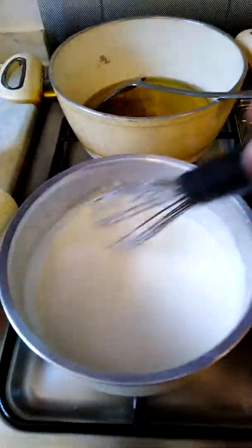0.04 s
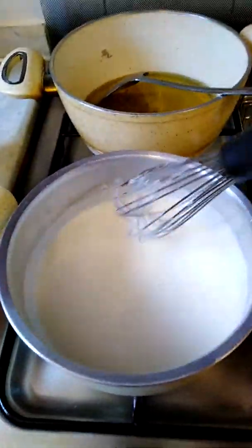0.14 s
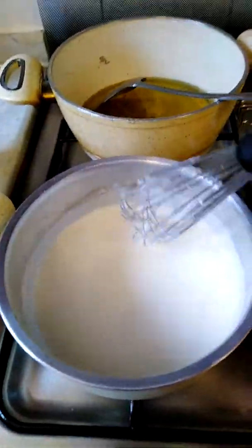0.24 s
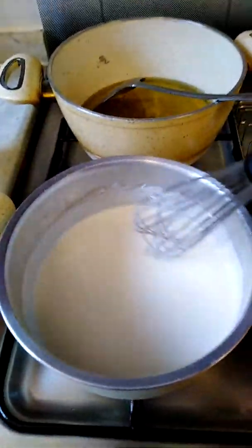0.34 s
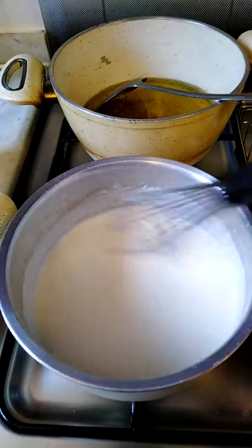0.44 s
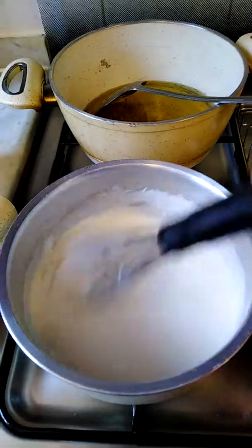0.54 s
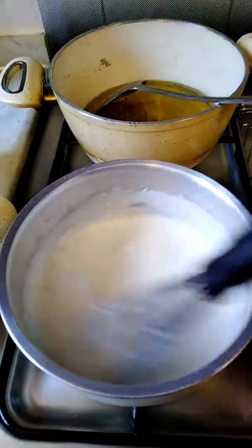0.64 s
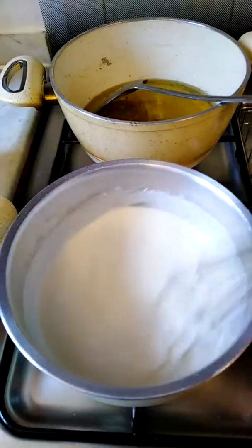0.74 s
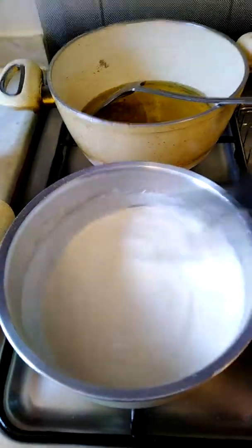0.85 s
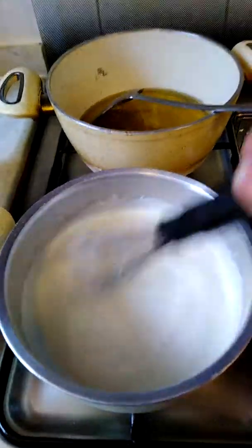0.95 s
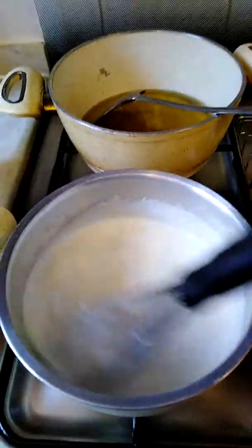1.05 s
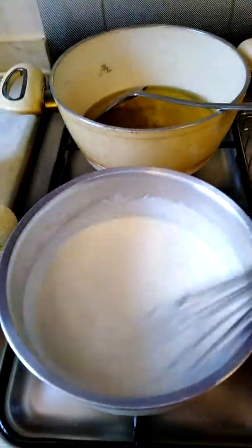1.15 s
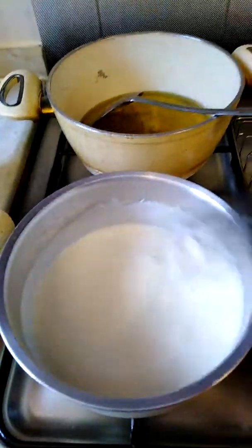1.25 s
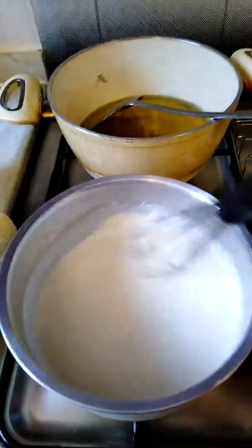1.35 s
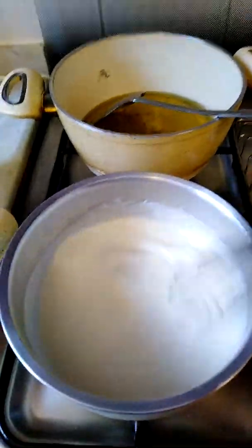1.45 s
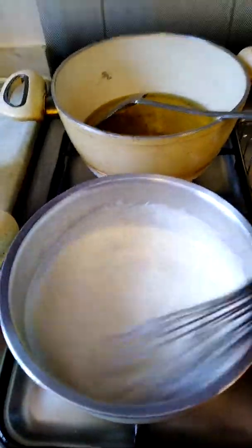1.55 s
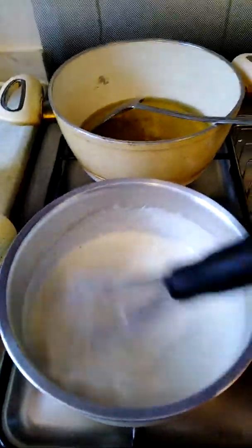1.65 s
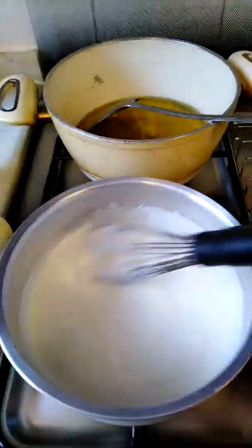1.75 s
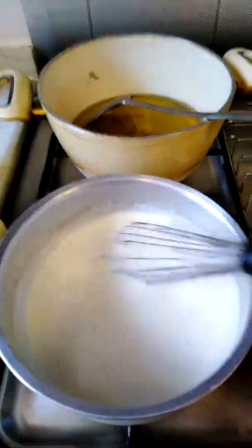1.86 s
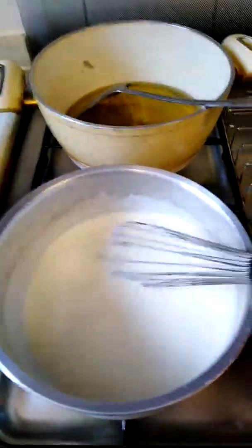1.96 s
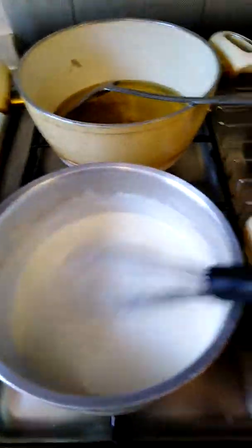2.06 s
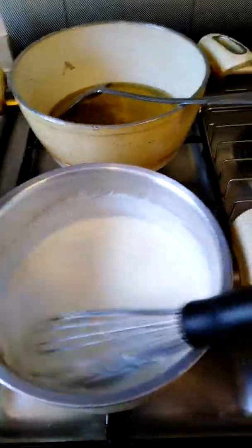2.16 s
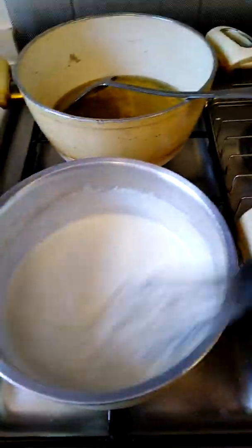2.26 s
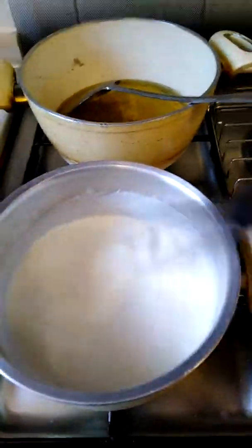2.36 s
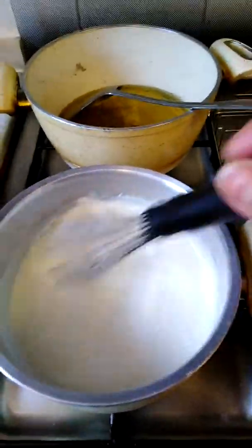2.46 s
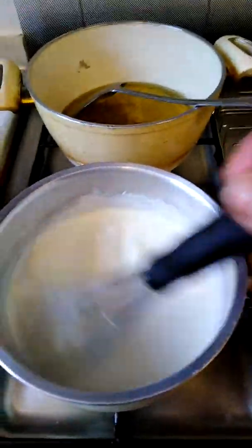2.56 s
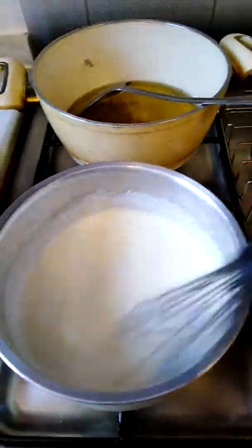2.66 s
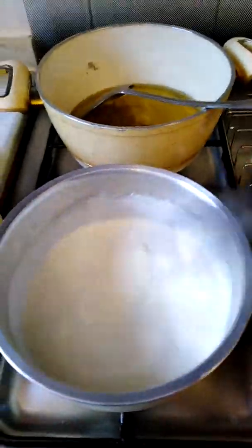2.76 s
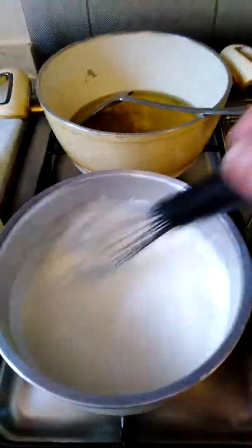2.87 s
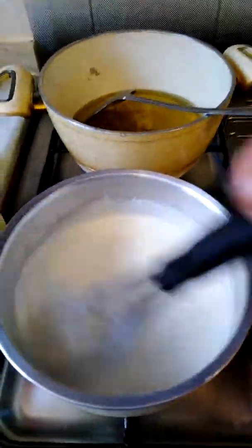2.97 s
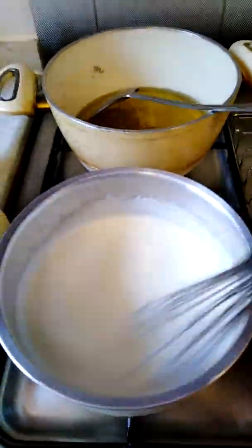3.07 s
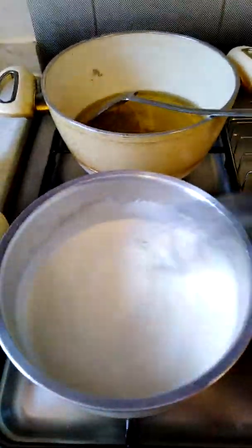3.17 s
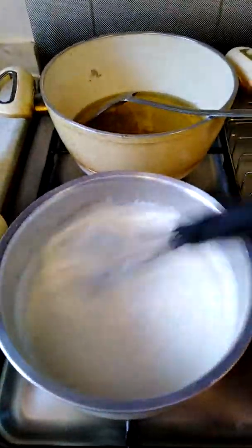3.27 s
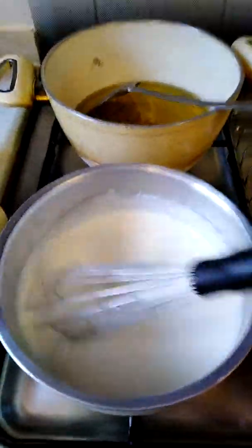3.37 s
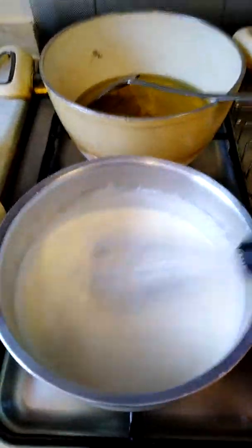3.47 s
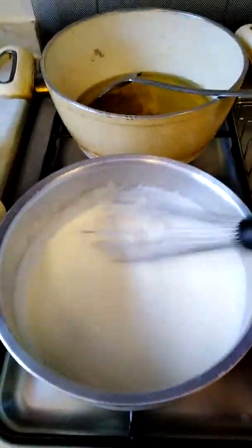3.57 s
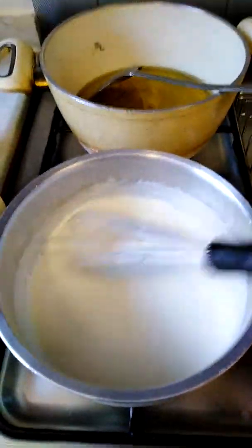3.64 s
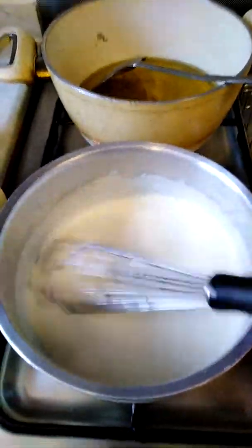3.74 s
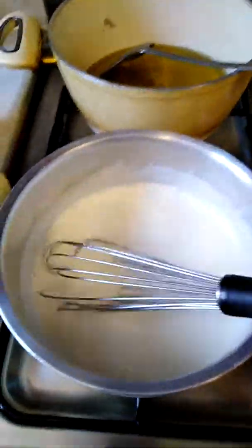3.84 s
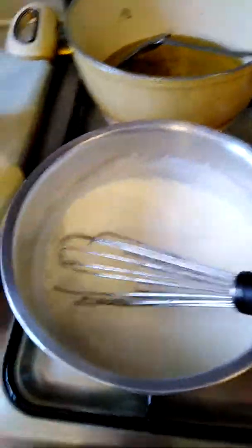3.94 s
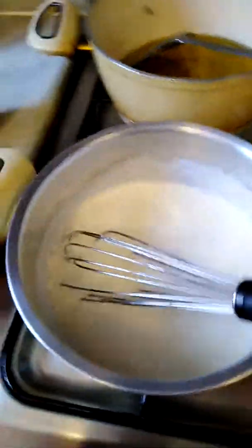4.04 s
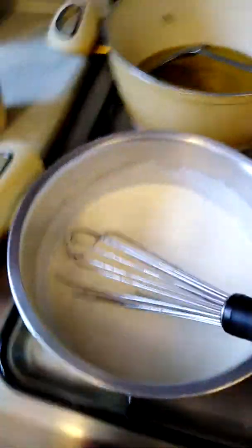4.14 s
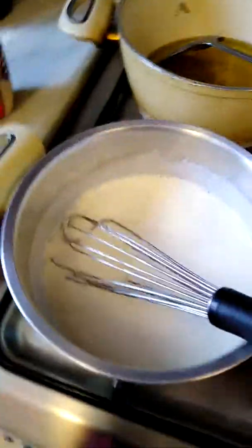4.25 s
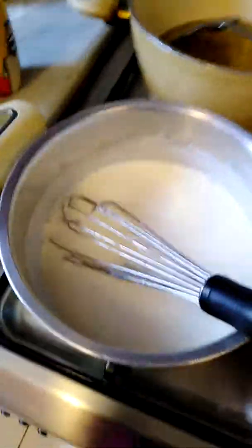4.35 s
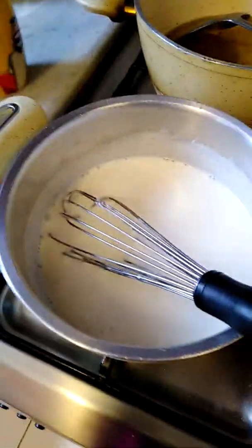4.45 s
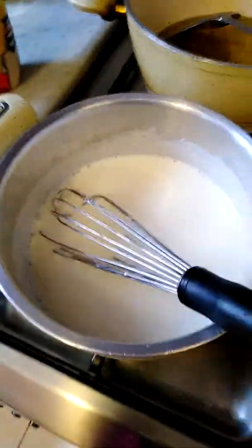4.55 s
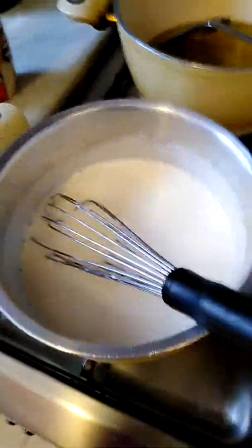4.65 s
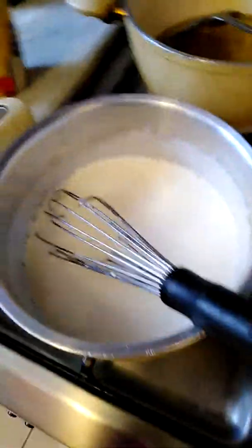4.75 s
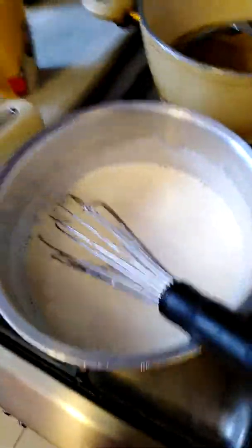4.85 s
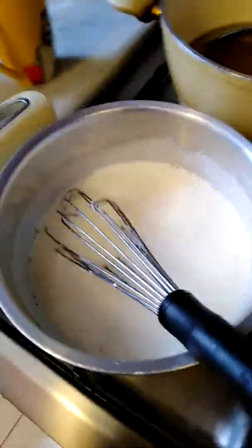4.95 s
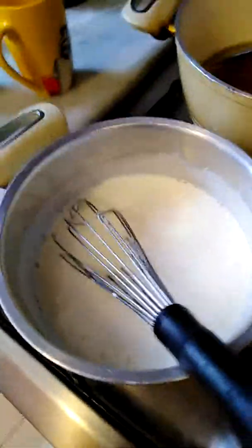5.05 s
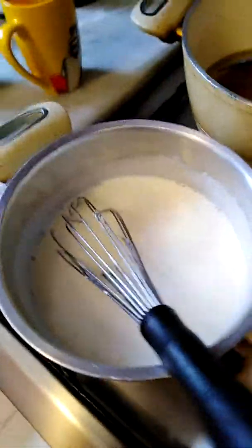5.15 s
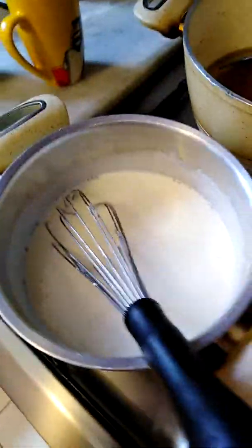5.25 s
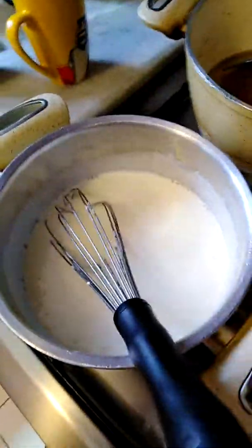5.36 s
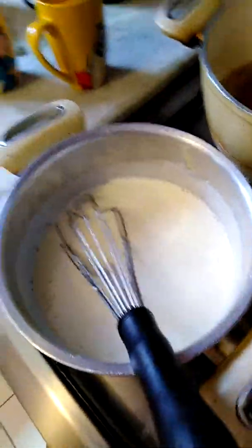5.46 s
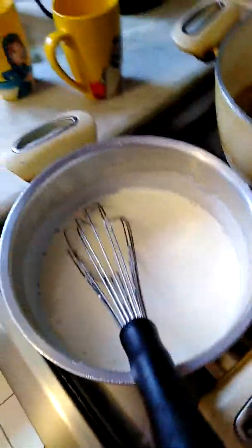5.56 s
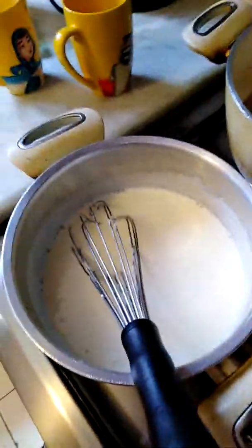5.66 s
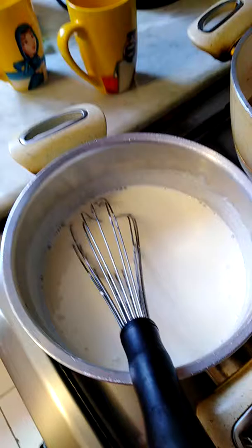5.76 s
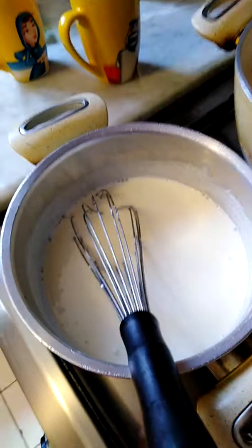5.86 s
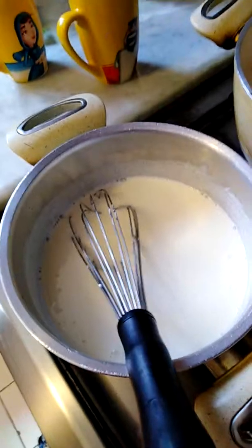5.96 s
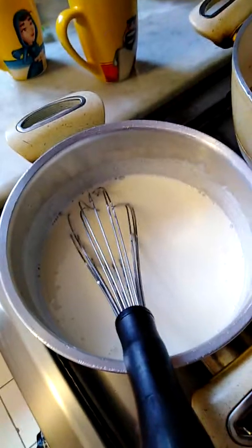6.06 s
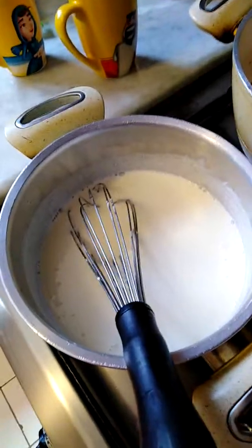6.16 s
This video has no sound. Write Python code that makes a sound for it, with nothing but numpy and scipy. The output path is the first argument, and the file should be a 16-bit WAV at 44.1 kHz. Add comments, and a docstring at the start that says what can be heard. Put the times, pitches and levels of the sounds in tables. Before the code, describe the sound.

A close stereo pickup in a small kitchen. A short scrape opens at 0 s, then a brief gap with only faint, watery flickering noise and weak low hum. From about 0.46 s a wire whisk works in a thin metal saucepan: tight clusters of bright, dry clicks at 0.47, 0.8, 1.27, 1.5, 1.64 and 1.93 s, joined by gritty, uneven scrapes and a low hollow pan ring. Stirring continues from 2.2 to 3.0 s with denser scraping, the hardest taps at about 3.17 s and another sharp group at 3.6 s. Soft, muffled sauce plops sound around 3.35 and 3.8 s. By 3.9 s the whisk rests. Very quiet plops, tiny pings and thin lingering tones follow, with barely audible ticks and handling rustles from 4.6 s. At 5.95 s a rounder plop sounds, and at 6.14 s a small tick and clearer hand rustle end it.

```python
"""A wire whisk taps and scrapes inside a thin metal saucepan of thick sauce, then is laid down.
Taps are noise bursts and drags are uneven grains, both ringing the modes of the pan.
The sauce plops as damped resonances; a hand rustles near two microphone ports.
Beneath lie narrow flickering bands of background noise, such as noise suppression leaves,
over faint hiss, rumble and a hum of two wavering sines."""
import sys
import numpy as np
from scipy import signal
from scipy.fft import rfft, irfft, next_fast_len
from scipy.io import wavfile
from scipy.ndimage import uniform_filter1d, map_coordinates

SR = 44100
rng = np.random.default_rng(int(sys.argv[2]) if len(sys.argv) > 2 else 0)


def wav_out(sig):
    """Save sig, one row per channel (or a flat mono array), as 16-bit PCM at SR to the path in sys.argv[1]."""
    wavfile.write(sys.argv[1], SR, np.round(np.clip(np.atleast_2d(sig).T, -1, 1) * 32767).astype(np.int16))


def attenuation_scalar(level_db):
    """Turn a level in dB into a linear amplitude multiplier (20 dB per decade)."""
    decades = np.asarray(level_db, float) / 20
    return 10 ** decades


N = 273861

# wire taps: t/s, rim level/dB before a common trim, body re rim/dB before the bottom and wall offsets,
# wires re rim/dB, left-right/dB
TAPS = [(0.4606, -20.5, -1, -1, -1.5), (0.4689, -18, -6, 2, 2), (0.4766, -19.5, -6.5, -10.5, -3.5),
        (0.504, -39.5, -7, 9.5, -7.5), (0.682, -33, -2, -9.5, 4), (0.75, -24, -19.5, -10, 14.5),
        (0.757, -23.5, -24.5, -11, -1), (0.78, -16.5, -17, -23, 1), (0.7936, -21.5, -24, -8, 9.5),
        (0.817, -23.5, -32, -1, 6), (0.842, -27.5, -24, -2, -4), (0.865, -30, -7, 5, -2),
        (0.904, -33, -20, 0, -2), (0.982, -49, -26, -5, -4), (1.008, -40, -24, 0, -6),
        (1.056, -35, -10, -13, -9), (1.2694, -22, -13, -10.5, -8), (1.272, -16.5, -21.5, -19, 3.5),
        (1.279, -22.5, -20, -13, 0), (1.305, -31, -15, -9, 2), (1.345, -30.5, -12, -1, -4),
        (1.503, -19.5, -35, -26, 0.5), (1.5269, -16, -37, -24, 7), (1.624, -21, -15, -1, 2.5),
        (1.6371, -14, -18, 1.5, -0.5), (1.934, -20.5, -46, -36, 2), (2.2084, -18.5, -6.5, 3, -0.5),
        (2.342, -30.5, -25, -6.5, 1), (2.3972, -19.5, -13, 4.5, -1.5), (2.4025, -27, -4.5, 0.5, -13),
        (2.5306, -31.5, -14, 0.5, -7.5), (2.597, -30, -16, 8, -1), (2.6074, -28, -14.5, 2, -1.5),
        (2.7193, -24, -20.5, -3.5, 6), (2.754, -24.5, -23, -10, -5), (2.774, -18, -29.5, 0.5, 0),
        (2.815, -32.5, -10.5, 5.5, -3), (3.0542, -22.5, -12.5, -6, 2.5), (3.077, -22, -24.5, -8, -2),
        (3.1659, -13, -26.5, -5.5, -1.5), (3.168, -11, -27.5, -5, 0.5), (3.176, -11, -22.5, -5.5, -2),
        (3.2472, -27.5, -9, -1, -7), (3.2617, -32.5, -9.5, -6, 10), (3.302, -31, -15, -4, 0),
        (3.3093, -22, -22.5, -6.5, -1), (3.496, -38, -8.5, 9, -2.5), (3.6112, -15, -18.5, 0, -7.5),
        (3.616, -18, -16, 0, -2), (3.624, -22.5, -19, -2, -3.5), (3.8111, -33.5, -5, -2.5, -10),
        (4.6, -61.5, -14, 3, -13), (4.813, -74, -17.5, 19.5, -15), (5.034, -60.5, -25, -3, -4),
        (5.2763, -76, -14.5, 10, 0), (5.953, -52, 4, -33.5, 2), (6.137, -44, -19, -31, 12)]
# bottom, wall, rim, wires: low edge f/Hz, high edge f/Hz
BANDS = [(450, 1500), (1500, 4500), (4500, 9300), (9300, 17000)]
LOW_MODE = [(790, 75, 0)]  # mode of the pan under the drag: f/Hz, width/Hz, level/dB


def unit(x):
    """Scaled to rms 1."""
    return x / np.sqrt(np.mean(x ** 2) + 1e-20)


def along(points, hz):
    """Interpolates (f/Hz, value) points on a log frequency axis."""
    f, v = np.transpose(points)
    return np.interp(np.log(hz + 1), np.log(f + 1), v)


def curves(rows):
    """One value per sample for each column after the time."""
    s, *cols = np.transpose(rows)
    return [np.interp(np.arange(N) / SR, s, c) for c in cols]


def wobble(rate_hz):
    """Smooth random curve with rate_hz knots a second."""
    knots = rng.standard_normal(int(N * rate_hz / SR) + 4)
    return map_coordinates(knots, [np.arange(N) * rate_hz / SR])


def filtered(x, response):
    """x through a complex response of frequency."""
    m = next_fast_len(x.shape[-1] + 4096)
    return irfft(rfft(x, m) * response(np.fft.rfftfreq(m, 1 / SR)), m)[..., :x.shape[-1]]


def modes(table, hz, spread_db=0):
    """Causal resonances of alternating sign, each at a random strength within spread_db rms."""
    luck_db = spread_db * rng.standard_normal(len(table))
    total = 0
    for k, (centre, width, db) in enumerate(table):
        resonance = 1j * hz * width / (centre * centre - hz * hz + 1j * hz * width)
        total = total + (-1) ** k * attenuation_scalar(db + luck_db[k]) * resonance
    return total


def band(hz, lo_hz, hi_hz):
    """Band gain with steep smooth edges."""
    return 1 / np.sqrt((1 + (lo_hz / (hz + 1)) ** 12) * (1 + (hz / hi_hz) ** 12))


def patchy(x, patchy_db, bins, frames):
    """Random gain in patches of time and frequency."""
    z = signal.stft(x, nperseg=512)[2]
    field = uniform_filter1d(rng.standard_normal(z.shape[-2:]), bins, 0)
    field = uniform_filter1d(field, frames, 1)
    return signal.istft(z * attenuation_scalar(patchy_db * unit(field)), nperseg=512)[1][..., :N]


def sides(db):
    """Left and right gains for a left-right difference."""
    return attenuation_scalar(np.array([db, -db]) / 2)


def swell(rows):
    """Power of strokes that rise and fall straight in dB; a row's level may hold several bands."""
    power = np.zeros((np.size(rows[0][1]), N + 2 * SR))
    t = np.arange(-SR // 2, SR // 2) / SR
    for s, db, rise_s, fall_s in rows:  # times per 20 dB
        slope = np.maximum(t / max(fall_s, .003), -t / max(rise_s, .0003))
        power[:, round(s * SR):][:, :len(t)] += attenuation_scalar(np.reshape(db, (-1, 1)) - 20 * slope) ** 2
    return power[:, SR // 2:][:, :N]


def spread(gain, patchy_db, bins, frames):
    """Stereo noise of rms 1 coloured by gain(hz); left-right likeness varies with frequency."""
    # f/Hz, left-right likeness (correlation)
    likeness = [(60, 0.94), (130, 0.97), (290, 0.28), (640, 0.78), (1400, 0.041), (3000, 0.043)]
    # f/Hz, left-right/dB of the background
    lean = [(60, -12.5), (110, 2), (200, -8.5), (380, 12), (700, 3), (1290, 15), (2380, 7), (4400, 9.5),
            (8120, 13), (15000, -4)]
    pair = patchy(rng.standard_normal((2, N)), patchy_db, bins, frames)

    def mid_side(hz):
        turn = np.arccos(np.clip(along(likeness, hz), -1, 1)) / 2
        return gain(hz) * np.array([np.cos(turn), np.sin(turn)])

    mid, side = filtered(pair, mid_side)
    return unit(filtered(np.array([mid + side, mid - side]), lambda hz: sides(along(lean, hz))))


def background():
    """Narrow flickering bands of noise, as noise suppression leaves, over faint hiss, hum and rumble."""
    # narrow bands: t/s, upper level/dB, middle level/dB, low level/dB
    band_levels = [(0.0, -50, -58, -56), (0.43, -53.5, -56, -65.5), (0.64, -51, -54, -56.5),
                   (1.49, -58, -57.5, -59), (2.32, -50.5, -55, -58.5), (2.7, -53, -59, -61),
                   (3.72, -53.5, -52.5, -59.5), (3.92, -58.5, -60.5, -81), (4.15, -55, -60, -71),
                   (4.29, -72.5, -66.5, -70), (4.6, -64.5, -63.5, -65.5), (4.75, -56.5, -71, -71),
                   (5.0, -53, -64, -69.5), (5.43, -51.5, -62, -70.5), (6.04, -49.5, -58, -74.5),
                   (6.21, -48, -56, -62.5)]
    # hum: t/s, upper line level/dB, lower line level/dB
    hum_levels = [(0.0, -53, -61), (0.43, -65, -69), (0.64, -57.5, -64), (1.49, -68, -82), (1.75, -55, -67),
                  (2.32, -66, -77), (2.61, -54.5, -57), (2.92, -62, -76), (3.27, -55.5, -59),
                  (3.92, -56, -57.5), (4.29, -63.5, -69), (5.43, -64.5, -84.5), (5.79, -59.5, -79),
                  (6.04, -68.5, -97), (6.21, -55, -80)]
    # thin treble: t/s, level/dB
    thin_level = [(0.0, -51), (0.26, -60), (0.64, -54), (1.49, -58), (3.92, -63), (4.29, -66.5),
                  (6.04, -66.5), (6.21, -71)]
    # narrow bands, shape before the power law: f/Hz, width/Hz, level/dB
    upper_modes = [(1384.5, 110, 0), (1514, 110, -2.5), (1646, 130, -6), (1026, 64, -7)]
    middle_modes = [(1276, 140, 0)]
    low_modes = [(355, 99, -5.5), (470, 50, 2), (532, 66, 0.5), (652, 100, 0)]
    thin_modes = [(2950, 30, -13), (4570, 34, -13), (5400, 110, -7.5), (7196, 78, 1), (7950, 43, -14),
                  (9120, 110, 0), (9700, 240, -12.5), (10560, 130, 2.5), (12600, 120, -12),
                  (13340, 480, 0.5), (14000, 220, -2.5)]
    # rumble spectrum shape: f/Hz, density/dB per Hz
    rumble_shape = [(15, -52), (25, -17), (70, -13.5), (118, -1), (145, -8.5), (182, -25), (226, -13),
                    (330, -14.5), (430, -49.5), (730, -120)]

    upper_db, middle_db, low_db = curves(band_levels)
    upper_line_db, lower_line_db = curves(hum_levels)
    thin_db, = curves(thin_level)

    def upper_gain(hz):
        return np.abs(modes(upper_modes, hz)) ** 2.24 * band(hz, 950, 1900)

    def low_gain(hz):
        return np.abs(modes(low_modes, hz)) ** 1.9 * band(hz, 370, 1100)

    def thin_gain(hz):
        return (0.015 + np.abs(modes(thin_modes, hz)) ** 2.2) * band(hz, 1500, 21000)

    upper = spread(upper_gain, 2.9, bins=2, frames=10)
    middle = spread(lambda hz: np.abs(modes(middle_modes, hz)) ** 2.0, 2.5, bins=2, frames=10)
    low = spread(low_gain, 3.4, bins=2, frames=10)
    thin = spread(thin_gain, 7.5, bins=2, frames=60)
    hiss = spread(lambda hz: band(hz, 1700, 9000), 1.3, bins=2, frames=20)
    rumble = spread(lambda hz: attenuation_scalar(along(rumble_shape, hz)), 4.2, bins=2, frames=10)

    t = np.arange(N) / SR
    upper_line = np.sin(2 * np.pi * 119.8 * t + 0.53 * wobble(4.3))
    lower_line = np.sin(2 * np.pi * 58.5 * t + 0.57 * wobble(4.6))
    hum = attenuation_scalar(upper_line_db + 2.7 * wobble(6.4)) * upper_line
    hum = hum + attenuation_scalar(lower_line_db + 1 * wobble(27)) * lower_line

    out = attenuation_scalar(upper_db) * upper + attenuation_scalar(middle_db) * middle
    out += attenuation_scalar(low_db + 1.9 * wobble(22)) * low + attenuation_scalar(thin_db) * thin
    return out + attenuation_scalar(-79.5) * hiss + attenuation_scalar(-67.5) * rumble + hum * sides(1.3)[:, None]


def kitchen(x):
    """Room: each third of a second gets a new noise tail; each frequency dies at its own speed."""
    # f/Hz, t60/s
    decay = [(300, 0.5), (2000, 0.42), (6000, 0.2), (14000, 0.1)]
    step, out = SR // 3, np.zeros((2, N + 2 * SR))
    for a in range(0, N, step):
        hz, t, z = signal.stft(rng.standard_normal((2, SR // 2)), SR, nperseg=256)
        z = z * attenuation_scalar(-60 * t / along(decay, hz)[:, None])
        tail = signal.istft(z, SR, nperseg=256)[1]
        wet = signal.fftconvolve(x[:, a:a + step], tail / np.linalg.norm(tail[0]), axes=1)
        out[:, a + 200:][:, :wet.shape[1]] += wet  # 200 samples of pre-delay
    return out[:, :N]


def pockets(table, width, thud_db):
    """Each soft noise push rings a resonance; width is relative to its pitch, a thud lies below it."""
    out, t = np.zeros((2, N + SR)), np.arange(SR // 2) / SR
    for s, db, hz, pan_db, life_ms in table:
        fade = attenuation_scalar(-60 * t * 1000 / max(life_ms, 10)) * (1 - np.exp(-t / .008))
        push = rng.standard_normal(len(t)) * fade
        resonance = [(hz, width * hz, 0)]
        ring = filtered(push, lambda f: modes(resonance, f) ** 2 + attenuation_scalar(thud_db) * band(f, 75, hz))
        ring = ring / np.abs(ring).max()
        out[:, round(s * SR):][:, :len(t)] += attenuation_scalar(db) * sides(pan_db)[:, None] * ring
    return out[:, :N]


def plops():
    """Air pockets burst as broad low resonances; narrow faint pings; thin lingering tones."""
    # all three: t/s, peak level/dB, f/Hz, left-right/dB, t60 of the push/ms
    bursts = [(1.762, -45, 161, 2, 150), (1.765, -51, 260, 3.5, 96), (3.334, -32.5, 362, 4, 96),
              (3.36, -34, 457, 4, 65), (3.375, -44, 208, 1, 155), (3.399, -44, 487, 9, 97),
              (3.8, -36, 417, 8.5, 110), (3.845, -42.5, 408, 7, 140), (3.835, -52, 188, 5, 150),
              (4.086, -52, 470, 13.5, 210), (4.19, -56.5, 470, 15, 100), (4.322, -53.5, 475, 14, 53),
              (4.408, -57.5, 453, 14, 52), (4.601, -51.5, 472, 9, 92), (4.62, -54, 600, 2, 140),
              (4.905, -57, 461, 12, 130), (5.59, -55, 613, -15, 220), (5.718, -58, 168, -12.5, 54),
              (5.96, -42, 615, -4.5, 320), (6.149, -48.5, 267, 11, 120)]
    # while the whisk rests
    pings = [(4.15, -64, 4550, 11, 200), (4.33, -67.5, 4240, 11, 260), (4.6, -70, 6090, 6, 420),
             (5.028, -59, 4570, -7, 270), (5.475, -69, 4270, 16, 340), (5.475, -68, 4420, 14, 280),
             (5.905, -65, 4600, 2, 150)]
    # after the handle is nudged
    tones = [(4.62, -71, 2950, 19, 1200), (5.41, -68, 2955, -8, 1200), (5.62, -64, 2980, 5.5, 900),
             (5.96, -62, 2950, 13, 600)]
    out = pockets(bursts, width=0.26, thud_db=-23.5)
    out = out + pockets(pings, width=0.03, thud_db=-61.5)
    return out + pockets(tones, width=0.014, thud_db=-70.5)


def ports(x, scatter_db, life_s):
    """Each port hears the direct sound plus its own quick reflections off the pan's rim and the hob."""
    t = np.arange(SR // 50) / SR
    echo = rng.standard_normal((2, len(t))) * attenuation_scalar(-60 * t / life_s)
    echo = attenuation_scalar(scatter_db) * echo / np.linalg.norm(echo, axis=1, keepdims=True)
    echo[0, 5] += 1  # the left port lies a few samples further away
    echo[1, 0] += 1
    return signal.fftconvolve(x[None], echo, axes=1)[:, :len(x)]


def metal(force, ring_db, spread_db):
    """The pan answers a force: broad clank plus modes, split into BANDS."""
    # modes of the pan: f/Hz, width/Hz, level/dB before ring_db
    pan = [(890, 25, -20), (1260, 210, -12), (2337, 90, -15), (2545, 59, -8.5), (3008, 190, -9),
           (3690, 67, -6.5), (5278, 260, -9), (6375, 150, -0.5), (6900, 300, -2.5), (8420, 300, -3),
           (8780, 250, -8), (9815, 380, -0.5), (11330, 370, -6.5), (12450, 420, -0.5)]
    # broad colour of steel on steel: f/Hz, density/dB per Hz
    clank = [(260, -36), (450, -24.5), (572, -16.5), (785, -1), (1160, -7), (2810, -9), (3030, -18.5),
             (3320, -7.5), (6730, 0), (7820, -4.5), (9940, -2.5), (13800, 0.5), (16300, -14)]

    def response(hz):
        split = np.array([band(hz, lo, hi) for lo, hi in BANDS])[:, None]
        return (attenuation_scalar(along(clank, hz)) + attenuation_scalar(ring_db) * modes(pan, hz, spread_db)) * split

    return filtered(force, response)


def rasps():
    """A wire rasps along the wall: uneven grains drive a few low modes."""
    # peak t/s, level/dB, 20 dB rise/s, 20 dB fall/s
    strokes = [(0.93, -44, .08, .04), (2.145, -43, .08, .05), (3.528, -37, .03, .15), (3.56, -37, .08, .08)]
    # f/Hz, width/Hz, level/dB before squaring
    wall_modes = [(1646, 160, 0), (1948, 160, -1), (2345, 200, -1), (2950, 250, -2), (3400, 250, -4)]
    grains = rng.standard_normal(N) * attenuation_scalar(2.2 * wobble(120))
    heard = ports(grains, scatter_db=-3.0, life_s=0.0049)
    ring = filtered(heard, lambda hz: modes(wall_modes, hz) ** 2 * band(hz, 1200, 3900))
    return np.sqrt(swell(strokes)) * unit(ring)


def drones():
    """Fine friction of wires crossing the bottom keeps a low mode of the pan ringing."""
    # peak t/s, level/dB, 20 dB rise/s, 20 dB fall/s (swell() sets least times)
    strokes = [(0.47, -49, 0, -0.5), (0.86, -49, 0, 0.44), (1.07, -42.5, -0.1, 0.04),
               (1.51, -46.5, 0.23, 0.12), (2.405, -42, 0, 0.05), (2.57, -45.5, 0.34, 0.14),
               (2.84, -43, 0, 0.34), (2.97, -41.5, 0, 0.1), (3.23, -43, 0.1, -0.05)]
    heard = ports(rng.standard_normal(N), scatter_db=-4, life_s=0.011)
    ring = filtered(heard, lambda hz: modes(LOW_MODE, hz) ** 2)
    return np.sqrt(swell(strokes)) * unit(ring)


def slips(rate_hz, size, life_s):
    """Gain that jumps when a wire catches, at random moments, and sinks again."""
    catch = (rng.random(N) < rate_hz / SR) * rng.exponential(size, N)
    return unit(1 + signal.lfilter([1], [1, -np.exp(-1 / (life_s * SR))], catch))


def contact():
    """Gains of bottom, wall, rim and wires: steady pressure, scrapes, a skid after each tap, the hand."""
    # wires resting on the pan as they stir: t/s, treble level/dB, bottom level/dB
    pressure = [(0.0, -34, -38), (0.18, -75, -87), (0.462, -83, -81), (0.48, -33, -45),
                (0.62, -53.5, -54.5), (0.85, -41.5, -43), (1.0, -46, -54.5), (1.26, -50.5, -66),
                (1.3, -55.5, -49), (1.6, -47, -57.5), (1.75, -43, -46.5), (1.92, -64, -69),
                (2.06, -61.5, -93), (2.14, -44, -85), (2.38, -43.5, -65), (2.47, -35.5, -60),
                (2.525, -58.5, -55), (2.55, -40.5, -53.5), (3.0, -44.5, -53), (3.15, -47.5, -56.5),
                (3.3, -54.5, -45), (3.48, -54, -65), (3.72, -43, -70), (3.9, -60.5, -59.5),
                (3.96, -81, -86), (6.21, -77.5, -74)]
    # single scrapes: peak t/s, treble level/dB before the rim and wires split, 20 dB rise/s, 20 dB fall/s
    # (swell() sets least times), bottom re treble/dB, wall re treble/dB
    scrapes = [(0.031, -32.5, 10, 0.01, -20, -12), (0.49, -34.5, 0, 0.2, -8.5, -13),
               (0.64, -43.5, 0.17, 1.5, -23, -5.5), (0.687, -28.5, 0.04, 0.2, -22, -14.5),
               (0.724, -34, 0.12, 0.06, -29, -20), (0.8, -22.5, -0.0161, -0.01, -29, -22.5),
               (0.938, -36.5, 0.28, 0.07, -8, -5), (1.058, -40, 0, 0.08, -11, -10),
               (1.131, -32, 0.08, 0.11, -26, -9.5), (1.155, -31.5, 0.08, 0.01, -21, -12),
               (1.471, -40.5, 0.1, 0.2, -32, -5), (1.641, -23, 0.02, 0.0662, -12.5, -11),
               (2.102, -35, 0.03, 0.24, -34, -12), (2.244, -36.5, 0.01, -0.05, -21, -3),
               (2.448, -34.5, 0, -0.12, -12, 2.5), (2.55, -40.5, 0.12, 0, -8.5, -4),
               (2.7, -34, 0.4, 0.53, -24, -12.5), (2.771, -26, 0.06, 0.04, -17, -8.5),
               (2.895, -32.5, 0.3, 0.04, -18, -9), (2.944, -38, -0.5, 0.24, -12, -12.5),
               (3.07, -29, 0, 0.02, -13, -11), (3.261, -29.5, 0.06, 0.12, -13.5, -8.5),
               (3.337, -37.5, 0, 0.36, -8, -11.5), (3.396, -39, 0.4, -0.16, -21, -4),
               (3.53, -37, -0.34, 0.07, -24.5, -4.5), (3.602, -25.5, 0.03, -0.09, -28.5, -13),
               (3.817, -39.5, 0.08, 0.17, -11.5, -7.5)]
    # a hand rustling near the microphone, same columns
    rustles = [(4.614, -71.5, 0.028, 0.13, -14, 12.7), (5.634, -68.5, 0.053, 0.2, -5, 8.7),
               (5.79, -72.5, 0.23, 0.1, -5, 16), (5.95, -70, 0.07, 0.2, 4.5, 14.5),
               (6.145, -49, 0.032, 0.63, -8, 1)]
    skid_db, skid_fall_s, skid_bottom_db, skid_wall_db = -17.5, 0.069, -22.5, -6.5
    wall_re_treble_db, rim_db, wires_db = -4, -4, -8.5

    treble_db, bottom_db = curves(pressure)
    skids = [(s, db + skid_db, 0, skid_fall_s, skid_bottom_db, skid_wall_db) for s, db, *_ in TAPS]
    strokes = []
    for s, db, rise_s, fall_s, low_db, mid_db in [*scrapes, *rustles, *skids]:
        strokes.append((s, [db + low_db, db + mid_db, db], rise_s, fall_s))
    steady = attenuation_scalar([bottom_db, treble_db + wall_re_treble_db, treble_db])
    bottom, wall, treble = np.sqrt(steady ** 2 + swell(strokes))
    return bottom, wall, attenuation_scalar(rim_db) * treble, attenuation_scalar(wires_db) * treble


def drag():
    """Stick-slip grains of uneven size; modes and reflections change as the wires travel round the pan."""
    grains = rng.standard_normal(N) * attenuation_scalar(1.6 * rng.standard_normal(N) + 1.4 * wobble(260))
    step, parts = 2048, np.zeros((len(BANDS), 2, N + SR))
    for a in range(0, N - step, step):
        piece = grains[a:a + 2 * step] * np.hanning(2 * step)[:N - a] ** .5
        heard = ports(np.pad(piece, (0, step)), scatter_db=8.5, life_s=0.024)
        sound = metal(heard, ring_db=5.0, spread_db=5)
        # equal strength per piece and band; contact() sets the level
        sound = sound / np.linalg.norm(sound, axis=(1, 2), keepdims=True)
        parts[..., a:a + heard.shape[1]] += sound
    parts = patchy(parts[..., :N], 2.15, bins=4, frames=5)
    parts[1:] *= slips(rate_hz=220, size=.5, life_s=0.002) * attenuation_scalar(.8 * wobble(90))
    parts[0] = filtered(parts[0], lambda hz: 4.5 + modes(LOW_MODE, hz))  # dragging keeps it humming
    mix = sum(gain * unit(part) for part, gain in zip(parts, contact()))
    return filtered(mix, lambda hz: band(hz, 30, 14500))


def taps():
    """A tap is several wires landing within milliseconds, the first ones hardest."""
    bottom_db, wall_db, trim_db = -2.5, 0.5, -6.5
    first_wire, first_wire_t60_s = 1.1, 0.0028
    out, t = np.zeros((2, N + SR)), np.arange(SR // 6) / SR
    envelope = first_wire * attenuation_scalar(-60 * t / first_wire_t60_s) + attenuation_scalar(-60 * t / 0.017)
    envelope = (envelope + 0.07 * attenuation_scalar(-60 * t / 0.14)) * (1 - np.exp(-t / 0.00041))

    def peak(v):
        return np.sqrt(uniform_filter1d(np.mean(v ** 2, 0), size=88).max())  # 2 ms rms

    for s, db, body_db, wires_db, pan_db in TAPS:
        # single wires stand out of the scuff
        wires = rng.standard_normal(len(t)) * (0.25 + (rng.random(len(t)) < 0.06))
        heard = ports(wires * envelope, scatter_db=-1.5, life_s=0.0056)
        parts = metal(heard, ring_db=8.5, spread_db=3.5)
        levels_db = (body_db + bottom_db, body_db + wall_db, 0, wires_db)
        sound = sum(attenuation_scalar(db + rel + trim_db) * v / peak(v) for v, rel in zip(parts, levels_db))
        out[:, round(s * SR):][:, :len(t)] += sides(pan_db)[:, None] * sound
    return out[:, :N]


def scene():
    """Whisk and sauce over the background; taps and plops also excite the room."""
    # left-right tilt of whisk and sauce: f/Hz, left-right/dB
    port_tilt = [(500, -0.5), (1300, 2), (2500, -5), (5000, -0.5), (8000, 2.5), (13000, -11.5)]
    hits = taps() + plops()
    whisk = hits + attenuation_scalar(-14.0) * kitchen(hits) + drag() + rasps() + drones()
    return filtered(whisk, lambda hz: sides(along(port_tilt, hz))) + background()


def suppressor(x, floor_db, depth_db):
    """Bands whose recent power sinks to the noise floor are turned down, at most to depth_db."""
    z = signal.stft(x, nperseg=512)[2]
    power = uniform_filter1d(np.abs(z) ** 2, size=3, axis=1)
    power = uniform_filter1d(power, size=5, axis=2, origin=1)
    gain = np.maximum(1 - attenuation_scalar(floor_db) ** 2 / (np.abs(power) + 1e-20), attenuation_scalar(depth_db))
    return signal.istft(z * gain, nperseg=512)[1][:, :N]


def low_pass(x):
    """Removes everything above the highest recorded frequency."""
    return signal.sosfilt(signal.butter(12, 16970, fs=SR, output="sos"), x)


def record(dry):
    """The top end drops steeply above 14.25 kHz; then noise suppression."""
    # f/Hz, level/dB
    top_end = [(25, -7.0), (45, -0.5), (14250, 0), (14500, -25), (15500, -24.5), (17000, -28)]
    heard = filtered(dry, lambda hz: attenuation_scalar(along(top_end, hz)))
    mix = suppressor(heard, floor_db=-100.0, depth_db=-13.0)
    return low_pass(mix)


dry = scene()
out = record(dry)
wav_out(out)
```